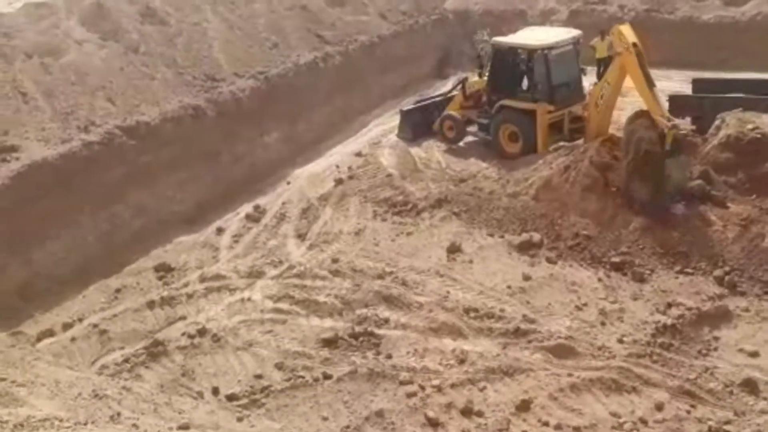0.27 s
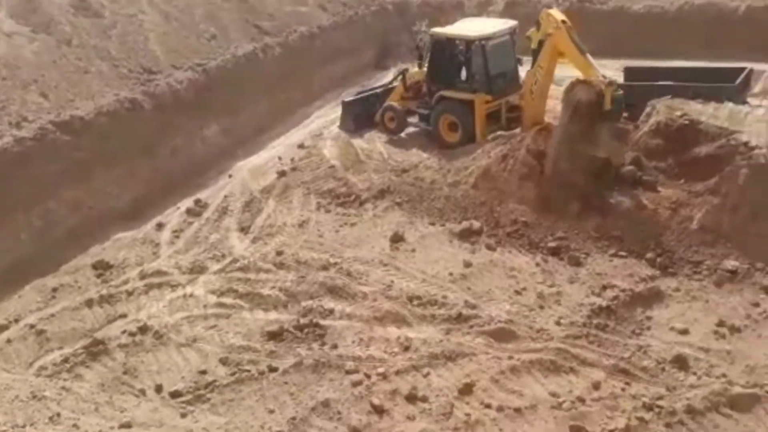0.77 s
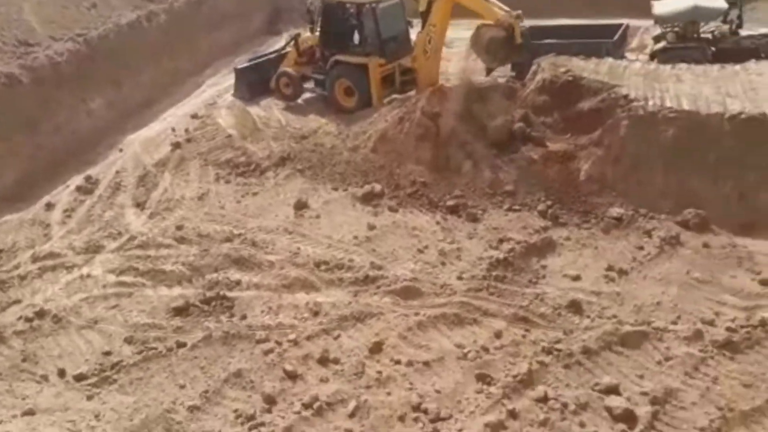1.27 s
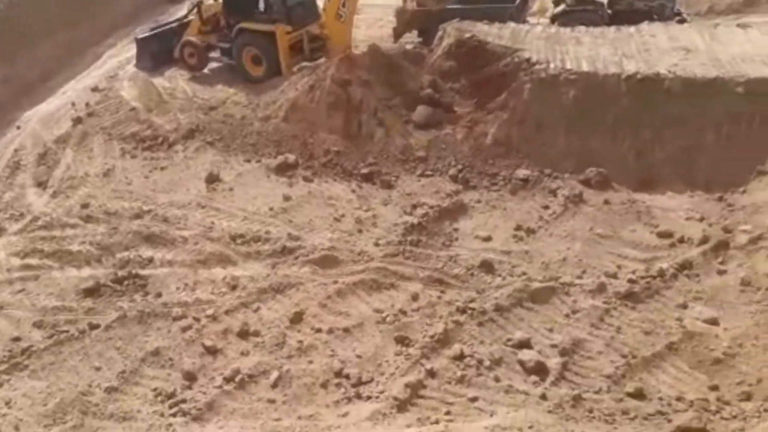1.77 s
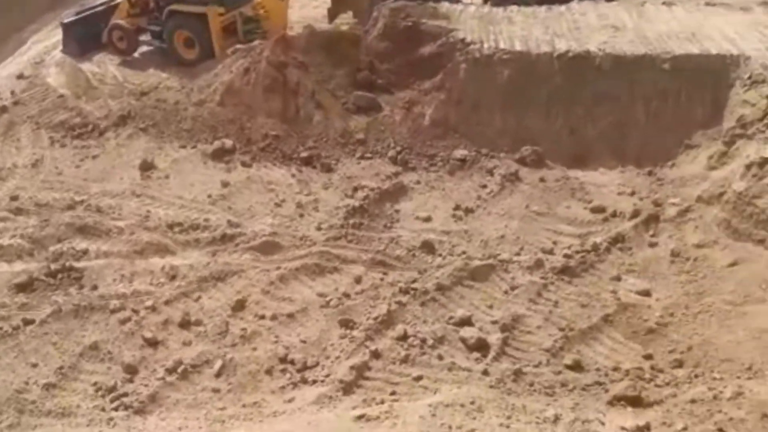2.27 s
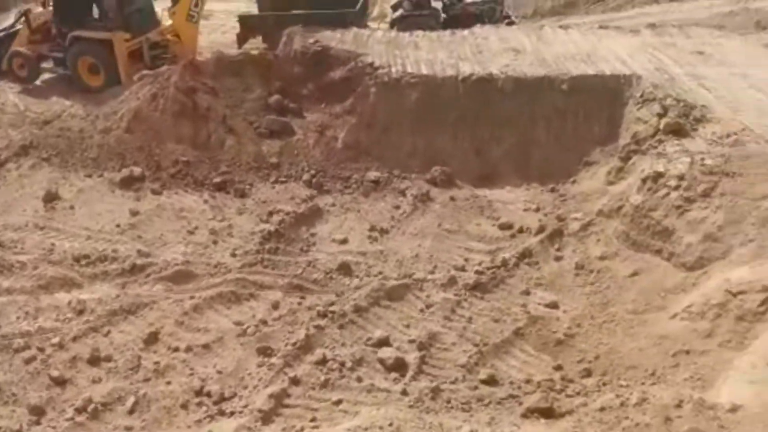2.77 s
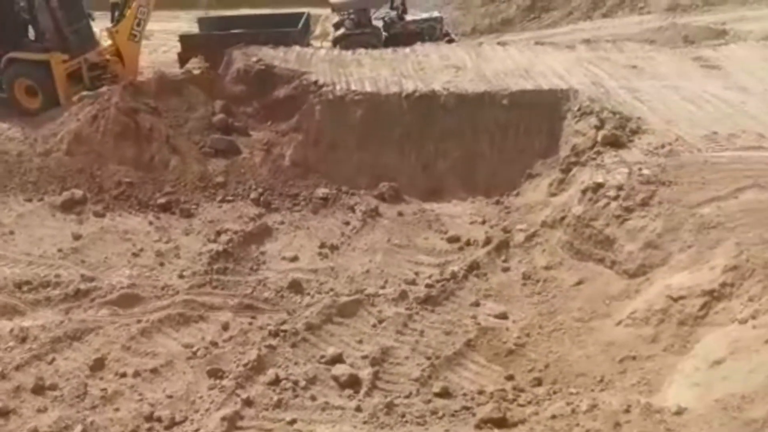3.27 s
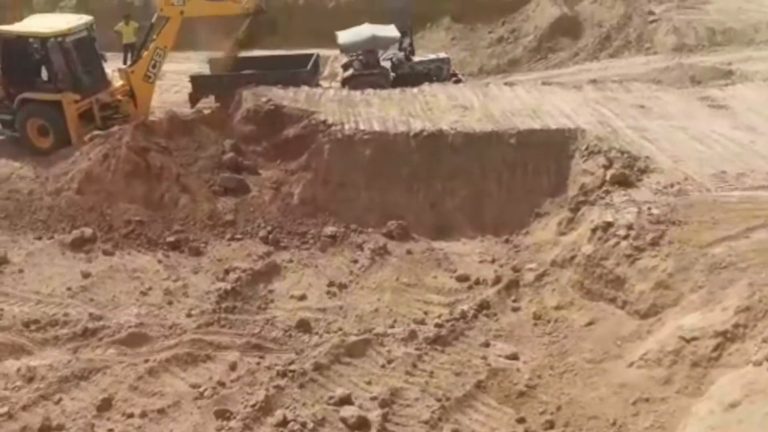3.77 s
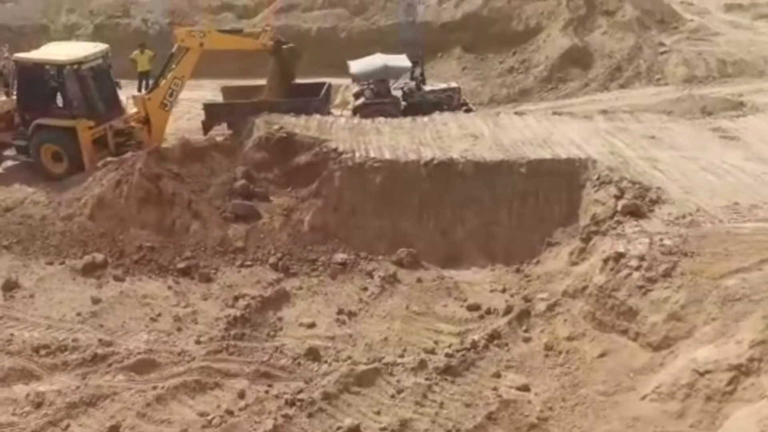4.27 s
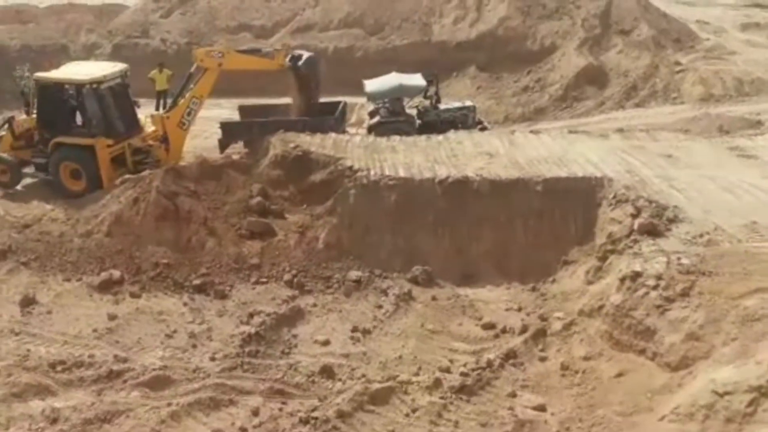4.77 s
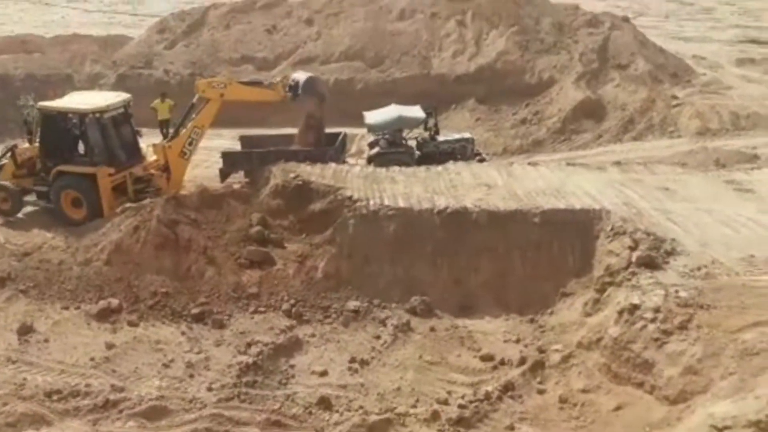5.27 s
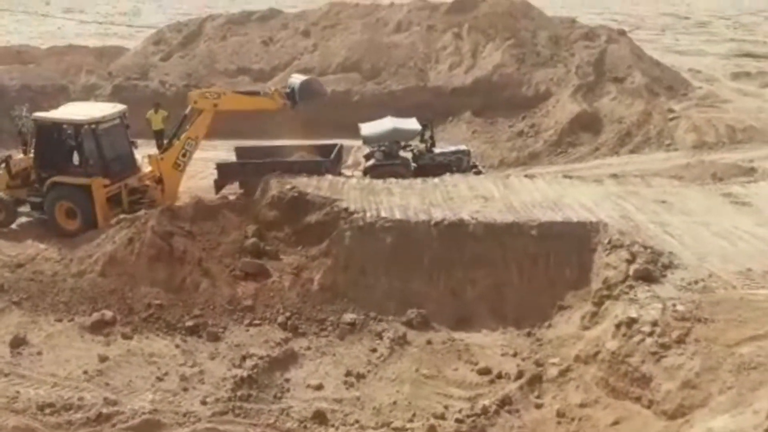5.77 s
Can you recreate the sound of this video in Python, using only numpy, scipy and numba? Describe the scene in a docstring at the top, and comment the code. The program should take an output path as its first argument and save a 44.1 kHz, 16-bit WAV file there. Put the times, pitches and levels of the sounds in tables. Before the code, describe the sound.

Wind thumps and flutters hard on a phone microphone while a diesel digger clatters at a distance, its bucket scraping and knocking as earth falls.

```python
"""Gusts thump and whistle in the two ports of a hand-held phone while a diesel digger works in an open pit.
Wind: noise with a ragged level rings each port's cavity and, as larger eddies, makes thump and flutter.
Digger: noise pulsed by each firing is the engine, banded noise the bucket and its knocks, treble noise a fine
hiss that follows the work. It arrives straight and again off the ground, a little sooner at the left port."""
import sys
import numpy as np
from scipy import signal
from scipy.fft import rfft, irfft
from scipy.io import wavfile
from scipy.ndimage import uniform_filter1d, map_coordinates
from numba import njit

SR = 44100
rng = np.random.default_rng(int(sys.argv[2]) if len(sys.argv) > 2 else 0)


def volts(x):
    """Linear amplitude factor 10**(x/20) for a level x in dB, scalar or array-like."""
    e = np.asarray(x, float) / 20
    return 10 ** e


def dump_mix(stems):
    """Bounce the given channels to the path in sys.argv[1] as a 16-bit WAV at rate SR."""
    frames = np.atleast_2d(stems).T  # one column per channel
    limited = np.clip(frames, -1, 1)  # hard clip at full scale
    pcm = np.round(limited * 32767).astype(np.int16)
    wavfile.write(sys.argv[1], SR, pcm)


N = 264688
T = np.arange(N) / SR
MOST_DB = 8.5  # bound on the ragged level of the eddies and on the slower wander of the large ones


def curves(table):
    """Linear interpolation: the columns of a table drawn out over time."""
    s, *columns = np.transpose(table)
    return [np.interp(T, s, c) for c in columns]


def unit(x):
    """Normalisation to an rms of 1."""
    return x / np.sqrt(np.mean(x ** 2))


def coloured(x, points):
    """Spectral shaping: weights each frequency by (Hz, dB) points, then scales to rms 1."""
    hz, db = np.transpose(points)
    f = np.maximum(np.fft.rfftfreq(N, 1 / SR), 1)
    gain = volts(np.interp(np.log(f), np.log(hz), db, right=-90))
    return unit(irfft(rfft(x) * gain, N))


@njit
def svf(x, hz, q):
    """Resonance: a state-variable band-pass whose centre moves, with gain 1 at the centre."""
    y, b, l = np.empty(len(x)), 0., 0.
    for i in range(len(x)):
        g = np.tan(np.pi * hz[i] / SR)
        v = (b + g * (x[i] - l)) / (1 + g * (g + 1 / q))
        b, l, y[i] = 2 * v - b, l + 2 * g * v, v / q
    return y


def walk(rate):
    """Slow random modulation: levels held 1 / rate s, smoothed twice over that time, rms 1."""
    k = int(SR / rate)
    held = np.repeat(rng.standard_normal(N // k + 1), k)
    return unit(uniform_filter1d(uniform_filter1d(held, k), k)[:N])


def bounded(db, limit):
    """Soft saturation: keeps a level or signal within plus or minus limit."""
    return limit * np.tanh(db / limit)


def delayed(x, ms):
    """Propagation delay: x arrives ms later, with cubic interpolation between samples."""
    return map_coordinates(x, [np.arange(N) - ms * SR / 1000], order=3, mode="nearest")


def rattles(rate, spread_db, length):
    """Random impacts: rate strikes a second with a spread of force, each decaying over length s."""
    strikes = (rng.random(N) < rate / SR) * volts(spread_db * rng.standard_normal(N))
    return unit(signal.lfilter([1], [1, -np.exp(-1 / (length * SR))], strikes))


# The strongest eddies. Each row: start in seconds, peak in dB before the port's gain,
# left minus right in dB, length in seconds.
STRONG_EDDIES = [(0.004, -2.5, -2, 0.0041), (0.01, -11.5, -1, 0.008), (0.058, -16, 9, 0.021),
                 (0.11, -4, 2.5, 0.0063), (0.193, -13.5, 3, 0.043), (0.904, -15, -7, 0.0079),
                 (0.958, -22, 3, 0.019), (1.059, -19, 9, 0.015), (1.152, -20.5, -6, 0.016),
                 (1.29, -5, -1.5, 0.044), (1.363, -19.5, 4, 0.041), (1.462, -12.5, -1, 0.01),
                 (1.513, -5.5, -1, 0.035), (1.577, -9.5, -1, 0.016), (1.607, -3.5, 6, 0.021),
                 (1.637, -13, -3, 0.015), (1.662, -8.5, -13, 0.0099), (1.674, -13, 8, 0.015),
                 (1.732, -1.5, 1, 0.012), (1.763, 2, 2, 0.031), (1.796, -6.5, 3, 0.041),
                 (1.856, -7.5, 6, 0.014), (1.893, -4, -1.5, 0.027), (1.922, -11, 2, 0.01),
                 (1.973, -7, -3, 0.026), (1.991, -6, -6, 0.01), (2.039, -19, 5, 0.06),
                 (2.099, -3.5, -7, 0.0056), (2.125, -7.5, -4, 0.057), (2.169, -9, -2, 0.012),
                 (2.22, -18, 3, 0.027), (2.298, -7.5, -5, 0.013), (2.387, -8.5, 4.5, 0.051),
                 (2.411, -8, -4, 0.014), (2.493, -25, 8, 0.017), (2.976, -10, 0, 0.033),
                 (3.01, -14.5, -2, 0.011), (3.111, -6.5, -2, 0.02), (3.146, -9, 3, 0.024),
                 (3.243, -15, -5, 0.017), (3.507, -27, -3, 0.018), (3.274, -13, -7, 0.0044),
                 (3.314, -16, 8.5, 0.019), (3.577, -3.5, 1, 0.03), (3.599, -11, 5, 0.027),
                 (3.726, -16.5, 4, 0.014), (3.765, -17, 8, 0.015), (3.806, -12, 2, 0.02),
                 (3.828, -5.5, 0, 0.017), (3.875, -8.5, -1.5, 0.047), (3.945, -7.5, -2, 0.023),
                 (4.015, -10.5, 4, 0.0076), (4.05, -13, 0, 0.016), (4.3, -18, -1, 0.027),
                 (4.33, -13.5, 6, 0.015), (4.345, -25, 0, 0.01), (4.379, -13.5, -6, 0.013),
                 (4.827, -34, 7, 0.01), (4.874, -36, 2, 0.018), (4.934, -28.5, 2, 0.021),
                 (5.021, -34, 13, 0.015), (5.178, -29, 2, 0.01), (5.246, -27, 8, 0.0088),
                 (5.354, -33, 8, 0.026), (5.511, -22, 1, 0.015), (5.55, -29.5, 13, 0.038),
                 (5.737, -29, 3, 0.015), (5.843, -27, 6, 0.0091), (5.884, -27.5, 8, 0.014),
                 (5.928, -23, 10, 0.009)]
SLAP_RISE = .14  # share of an eddy's length
LANDING_DB = -3
SNAPS_PER_S, SNAP_DB = 240, -5


def port_eddies(side, ragged_db, wind_db):
    """Turbulent pressure at a port edge: noise of ragged level, with separate strong eddies landing on it."""
    # some eddies burst in a single snap
    snaps = rattles(SNAPS_PER_S, 3.0, .0006)
    grain = unit(rng.standard_normal(N) * (1 + volts(SNAP_DB) * snaps))
    eddies = unit(grain * volts(ragged_db)) * volts(wind_db)
    for s, peak_db, slap_pan_db, length in STRONG_EDDIES:
        i = int(s * SR)
        # the flow lets go of the port edge just before a strong eddy lands
        eddies *= 1 - 0.45 * np.exp(-((T - s + 0.006) / 0.007) ** 2)
        t = np.arange(min(int(.06 * SR), N - i)) / SR
        shape = np.minimum(t / (SLAP_RISE * length), 1) * np.exp(-(t / length) ** 2)
        # it lands with a snap
        shape += volts(LANDING_DB) * np.exp(-((t - .001) / .0012) ** 2)
        slap = volts(peak_db - 13 + side * slap_pan_db / 2) * shape
        eddies[i:i + len(t)] += slap * grain[i:i + len(t)][::-1]
    return eddies


# The phone turns in the hand. Each row: time in seconds, lag of the right port in ms, whistle centre in Hz
# about which it wanders, narrow peak over the broad one in dB, mean wind left minus right in dB.
PHONE_TURN = [(0, 0.1, 1150, 1, 5), (0.05, 0.085, 880, 0, 1.5), (0.3, 0.08, 755, -3, 11.5),
              (0.9, 0.08, 763, 4, 7), (1.3, 0.07, 808, 0, 2.5), (2.3, 0.076, 827, 0, 2),
              (3.1, 0.083, 731, 4, 0.5), (3.2, 0.066, 1010, -27, 1.5), (3.85, 0.085, 920, -58, -2),
              (4.2, 0.06, 866, -16, 6.5), (4.36, 0.032, 686, -26, -2), (4.6, 0.01, 1120, 2.5, 3),
              (5.0, 0.18, 1124, 3.5, 4.5), (6, 0.19, 1100, -7.5, 4)]
PORT_TOP_HZ, PORT_LIMIT = 2830, .9


def port_whistle(eddies):
    """Cavity resonance: eddies excite a broad and a narrow band whose shared centre wanders."""
    _, hz, narrow_db, _ = curves(PHONE_TURN)
    centre = hz * np.exp(0.081 * walk(30.5))
    broad = svf(svf(svf(eddies, centre, 0.74), centre, 0.74), centre, 0.75)
    whistle = broad + volts(narrow_db) * svf(broad, centre, 4.15)
    # the hardest eddies overload the capsule
    whistle = bounded(volts(15.5) * whistle, PORT_LIMIT)
    return signal.sosfilt(signal.butter(2, PORT_TOP_HZ, fs=SR, output="sos"), whistle)


# Spectrum of the thump. Each row: frequency in Hz, relative density in dB per Hz.
THUMP_SPECTRUM = [(15, -56), (30, -11.5), (70, 0.5), (150, -0.5), (300, -7), (600, -12.5), (1200, -50)]
THUMP_WANDER_DB = 6  # spread before the bound


def port_thump(ragged_db, swell):
    """Low-frequency turbulence: noise from this port's own large eddies plus the swell that covers both."""
    own_db = 2.1 * ragged_db + bounded(THUMP_WANDER_DB * walk(21), MOST_DB)
    return coloured(rng.standard_normal(N) * volts(own_db) + swell, THUMP_SPECTRUM)


CALM_DB = -40  # gust strength at which the flutter has its stated centre and the rumble its tabled level
FLUTTER_HZ, FLUTTER_OCTAVES_PER_DB = 264.5, 0.035  # centre at CALM_DB, rise with the gust


def port_flutter(ragged_db, level_db):
    """Eddy scaling: harder wind sheds smaller eddies, so the centre of this noise band rises with the gust."""
    flutter = rng.standard_normal(N) * volts(.5 * ragged_db + 2.2 * walk(24.814))
    hz = FLUTTER_HZ * 2 ** (FLUTTER_OCTAVES_PER_DB * (level_db - CALM_DB))
    return unit(svf(svf(flutter, hz, 0.74), hz, 0.74))


# Low rumble were the gust at CALM_DB. Each row: time in seconds, strength in dB before scaling to thump and flutter.
RUMBLE_STRENGTH = [(0, -34.5), (0.4, -37.5), (0.9, -35.5), (1.2, -34), (1.7, -35.5), (2.2, -37.5),
                   (2.6, -31), (3.0, -37), (3.3, -33.5), (3.6, -33.5), (3.9, -35.5), (4.2, -33.5),
                   (4.5, -35), (5.0, -37.5), (5.25, -34.5), (6, -36.5)]
# The largest eddies shove both ports. Each row: time in seconds, rise over the rumble strength in dB.
LARGE_SHOVES = [(0.671, 8.5), (1.52, -0.5), (1.651, 6), (1.779, 5), (2.401, 6), (2.8, 1), (3.167, 5),
                (4.056, 11), (4.093, 10.5), (4.77, 8), (4.92, 5.5), (5.139, 10), (5.24, 9), (5.285, 7),
                (5.55, 4.5), (5.65, 2), (5.685, 5), (5.82, 4.5), (5.989, 2)]
SHOVE_S = 0.013
RUMBLE_PER_GUST_DB, RUMBLE_WANDER_DB = .5, 1


def rumble_strength(level_db, heave):
    """Pressure fluctuation growing with wind: rumble in dB, lifted by the gust and by brief shoves."""
    shove_db = sum(db * np.exp(-((T - s) / SHOVE_S) ** 2) for s, db in LARGE_SHOVES)
    gust_db = RUMBLE_PER_GUST_DB * (level_db - CALM_DB)
    return curves(RUMBLE_STRENGTH)[0] + shove_db + gust_db + RUMBLE_WANDER_DB * heave


# Strength of the wind on the ports. Each row: time in seconds, buffeting in dB before the port's gain.
GUST_STRENGTH = [(0.0, -16), (0.05, -30), (0.1, -22.5), (0.3, -35), (0.45, -40), (0.75, -39.5), (0.82, -49),
                 (0.89, -33), (1.0, -32.5), (1.08, -34), (1.3, -26.5), (1.42, -33), (1.5, -25.5),
                 (1.9, -24), (2.16, -22), (2.2, -31.5), (2.24, -24), (2.4, -25.5), (2.47, -29.5),
                 (2.54, -28), (2.7, -40), (2.81, -29), (2.87, -48.5), (2.99, -25), (3.27, -26), (3.33, -35),
                 (3.36, -50.5), (3.48, -46), (3.55, -30.5), (3.7, -39.5), (3.82, -28.5), (3.96, -25),
                 (4.07, -46), (4.16, -34), (4.24, -44.5), (4.35, -30.5), (4.42, -50), (5.3, -53),
                 (5.53, -48), (6.0, -47)]
SIDE_WANDER_DB = 2


def port(side, shared_db, swell, veer, heave):
    """Wind noise at one port (side 1 left, -1 right): ragged eddies ring its cavity, larger ones thump."""
    level_db, = curves(GUST_STRENGTH)
    pan_db = curves(PHONE_TURN)[3] + SIDE_WANDER_DB * veer
    # the eddies' level changes within milliseconds
    ragged_db = bounded(shared_db + 1.3 * walk(35) + 4.0 * walk(120), MOST_DB)
    whistle = port_whistle(port_eddies(side, ragged_db, level_db + side * pan_db / 2))
    rumble_db = rumble_strength(level_db, heave) + 0.06 * side * pan_db
    thump = volts(0.63 * rumble_db - 17.5) * port_thump(ragged_db, swell)
    # the flutter above the thump grows faster than the thump
    flutter = volts(1.212 * rumble_db + 5.0) * port_flutter(ragged_db, level_db)
    return whistle + thump + flutter


# Spectrum of the engine clatter. Each row: frequency in Hz, relative density in dB per Hz.
CLATTER_SPECTRUM = [(500, -25), (1000, -10), (2000, -0.5), (3000, -6), (4500, -5.5), (6300, -10.5),
                    (7900, -13.5), (8500, -33)]
FIRING_HZ = 72.2  # mean rate
CYLINDER_DB = 5.5  # bound on each firing's departure from the usual strength


def engine():
    """Amplitude modulation: injector clatter swells with each firing and decays until the next."""
    phase = np.cumsum(FIRING_HZ * (1 + 0.017 * walk(12.0)) / SR)
    cylinder_db = CYLINDER_DB * np.tanh(rng.standard_normal(N // 300))[phase.astype(int)]
    firing = 0.56 + volts(cylinder_db) * np.exp(-(phase % 1) / 0.84)
    return coloured(rng.standard_normal(N) * firing, CLATTER_SPECTRUM)


# Bands of the steel. Each row: centre in Hz before the bend, nominal width in Hz, gain in dB.
BUCKET_BANDS = [(1184, 376, -3.5), (2027, 223, -3.5), (2880, 266, -6), (3620, 133, -6.5), (4400, 220, -11),
                (5430, 150, -17.5), (6750, 570, -26)]
# The bands shift as the bucket drags and empties. Each row: time in seconds, pitch ratio.
BUCKET_BEND = [(0, 0.996), (3.5, 1.015), (3.59, 0.95), (3.62, 1.05), (3.67, 0.92), (3.75, 1.015),
               (4.14, 1.0), (4.26, 0.975), (4.36, 0.98), (6, 1.024)]


def bucket(x):
    """Modal resonance: the steel bucket and arm ring in a few bands that shift together."""
    bend, = curves(BUCKET_BEND)
    ring = np.zeros(N)
    for hz, width, db in BUCKET_BANDS:
        centre, q = hz * bend, 0.52 * hz / width
        ring += volts(db) * svf(svf(x, centre, q), centre, q)
    return ring


# Spectrum of the treble hiss. Each row: frequency in Hz, relative density in dB per Hz.
TREBLE_SPECTRUM = [(8300, -18.5), (9100, -5), (10000, -5.5), (11000, -7), (12500, -7.5), (14000, -9),
                   (15500, -22)]


def treble_hiss(rattle, crackle):
    """Noise modulation: a treble hiss flickers and follows the strikes."""
    flicker = volts(1.8 * walk(220) + 2.4 * walk(4.09))
    strikes = 1 + 0.13 * rattle + 0.36 * crackle
    return coloured(rng.standard_normal(N) * flicker * strikes, TREBLE_SPECTRUM)


# Knocks and crunches. Each row: start in seconds, peak in dB before the mix, centre in Hz,
# strength of the treble in dB before scaling, decay by 60 dB in seconds.
KNOCK_EVENTS = [(0.181, -21.5, 1390, -34, 0.089), (1.119, -41, 1950, -10.5, 0.054),
                (2.927, -51, 1830, -15, 0.2), (2.951, -23, 2170, -30, 0.18),
                (3.132, -18.5, 1400, -13, 0.16), (3.146, -25, 2800, -38, 0.51),
                (3.2287, -27, 1460, -15, 0.25), (3.278, -44, 1460, -6, 0.29), (3.453, -32, 1490, -19, 0.05),
                (3.5328, -29, 2340, -26, 0.48), (3.601, -16.5, 2040, -42, 0.24),
                (3.612, -16.5, 2080, -44, 0.22), (3.649, -19, 1950, -28, 0.08),
                (3.669, -33, 1950, -11, 0.083), (3.725, -30, 2870, -37, 0.17),
                (3.9413, -15, 1400, -29, 0.17), (3.9592, -26, 2900, -11.5, 0.17),
                (3.998, -33.5, 1950, -3.5, 0.12), (4.125, -25, 1780, -40, 0.64),
                (4.281, -49, 1520, 0.5, 0.083), (4.371, -26, 1830, -36, 0.22),
                (4.4857, -36, 1990, -29, 0.41), (4.444, -42, 3500, -26, 0.2),
                (4.547, -32.5, 4420, -19, 0.082), (4.573, -30.5, 1840, -42, 0.17),
                (4.592, -30.5, 1980, -32, 0.27), (4.8772, -34, 2120, -43, 0.069),
                (4.9756, -35, 2800, -15.5, 0.096), (5.248, -38, 1720, -38, 0.046),
                (5.3631, -36, 1440, -27, 0.39), (5.5177, -45, 1900, -37, 0.045),
                (5.556, -38, 1480, -34, 0.059), (5.884, -34, 1540, -38, 0.036),
                (5.931, -38, 1700, -34, 0.05)]
KNOCK_RISE_S = 0.0023


def knocks():
    """Impact excitation: each blow is a decaying noise band; returned with the envelope of its treble."""
    body, top = np.zeros(N), np.zeros(N)
    for s, peak_db, hz, top_db, t60 in KNOCK_EVENTS:
        i = int(s * SR)
        t = np.arange(min(int(.4 * SR), N - i)) / SR
        decay = np.exp(-np.log(1000) * np.maximum(t - KNOCK_RISE_S, 0) / t60)
        fall = np.minimum(t / KNOCK_RISE_S, 1) * decay
        noise, tone = rng.standard_normal(len(t)), np.full(len(t), float(hz))
        ring = unit(svf(svf(noise, tone, 1.2), tone, 1.2)) + volts(1.39 * top_db + 25) * noise
        body[i:i + len(t)] += volts(peak_db - 6.0) * fall * ring
        # the treble dies sooner than the ring
        top[i:i + len(t)] += volts(peak_db - 3.0 + top_db) * fall ** 1.76
    return signal.sosfilt(signal.butter(10, 7800, fs=SR, output="sos"), body), top


# The digger's work. Each row: time in seconds, working noise in dB, bucket scrape over it in dB,
# treble hiss in dB.
DIGGER_WORK = [(0.0, -54.5, 10.5, -72), (0.9, -55.5, 2.5, -69), (1.4, -53, 3, -68.5),
               (1.8, -58.5, 10.5, -64), (2.56, -52.5, -16, -64), (2.9, -50.5, 0, -64.5),
               (2.96, -47, -24, -59.5), (3.12, -45.5, 11.5, -56), (3.17, -41.5, 2, -52.5),
               (3.55, -47.5, 0, -59.5), (3.62, -42.5, 1.5, -58), (3.9, -46.5, 4, -58.5),
               (4.0, -36, -1, -51), (4.24, -40.5, -1, -50.5), (4.34, -49, -7, -56), (4.46, -44, 1, -56.5),
               (4.65, -48.5, -5, -63), (5.0, -49, 1.5, -62.5), (5.5, -49, 3, -62),
               (5.65, -45.5, -3.5, -59.5), (6.0, -51, 3, -65)]
DULL_DB, RING_DB = -5, 5.5  # a knock's own thud and the ring of the bucket


def digger(rattle):
    """Superposition of sources: engine clatter, scraping and knocking bucket, and a treble hiss."""
    work_db, scrape_db, hiss_db = curves(DIGGER_WORK)
    clatter = engine()
    crackle = rattles(500, 4, .0008)  # clods land one by one
    rasp = rng.standard_normal(N) * (0.46 + rattle + 0.73 * crackle)
    scrape = unit(bucket(rasp))
    hiss = treble_hiss(rattle, crackle)
    body, top = knocks()
    working = volts(work_db) * (clatter + volts(scrape_db) * scrape)
    knocking = volts(DULL_DB) * body + volts(RING_DB) * bucket(body)
    return working + knocking + (volts(hiss_db) + top) * hiss


SCATTERED_SHARE = .45  # of the power


def scattered_pair():
    """Partial coherence: both ports share a direct sound, and the pit scatters part differently to each."""
    rattle = rattles(70, 4.5, .004)  # loose parts
    direct, left, right = (digger(rattle) for _ in range(3))
    pairs = (direct, left), (delayed(direct, curves(PHONE_TURN)[0]), right)
    return np.array([np.sqrt(1 - SCATTERED_SHARE) * d + np.sqrt(SCATTERED_SHARE) * s for d, s in pairs])


GROUND_MS, GROUND_SHARE, GROUND_TOP_HZ = 1.293, 0.22, 3860


def with_ground(heard):
    """Ground reflection: an inverted, late and dull copy interferes with the straight sound."""
    ground = signal.sosfilt(signal.butter(1, GROUND_TOP_HZ, fs=SR, output="sos"), heard)
    return heard - GROUND_SHARE * np.array([delayed(g, GROUND_MS) for g in ground])


def scene():
    """Superposition at two ports: wind of partly shared strength over the distant digger."""
    heard = with_ground(scattered_pair())
    shared_db = 0.82 * walk(24.06)
    # the largest eddies cover both ports at once
    swell = 0.65 * rng.standard_normal(N) * volts(bounded(11.0 * walk(12), MOST_DB))
    # the wind veers from port to port and the large eddies come and go
    veer, heave = walk(9.9), walk(12)
    wind = np.array([port(side, shared_db, swell, veer, heave) for side in (1, -1)])
    return heard * volts(np.array([[.5], [-.5]])) + wind  # digger 1 dB stronger at the left


def low_pass(x):
    """Removes everything above the highest recorded frequency."""
    return signal.sosfilt(signal.butter(12, 15530, fs=SR, output="sos"), x)


# Spectrum of the capsule hiss. Each row: frequency in Hz, relative density in dB per Hz.
HISS_SPECTRUM = [(6000, -29), (9000, -4), (12000, -2), (15500, 6)]
CAPSULE_HISS_DB = -73
TOP_HZ = 15500


def record(dry):
    """Self-noise and band limiting: each capsule hisses faintly; the phone cuts the deepest bass and the top."""
    hiss = np.array([coloured(rng.standard_normal(N), HISS_SPECTRUM) for _ in dry])
    mix = dry + volts(CAPSULE_HISS_DB) * hiss
    mix = signal.sosfilt(signal.butter(2, 24, "high", fs=SR, output="sos"), mix)
    mix = signal.sosfilt(signal.ellip(8, .2, 70, TOP_HZ, fs=SR, output="sos"), mix)
    return low_pass(mix)


dry = scene()
out = record(dry)
dump_mix(out)
```